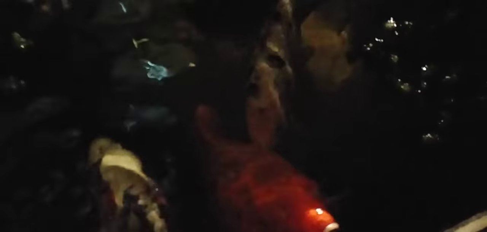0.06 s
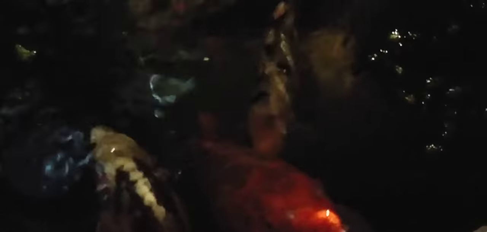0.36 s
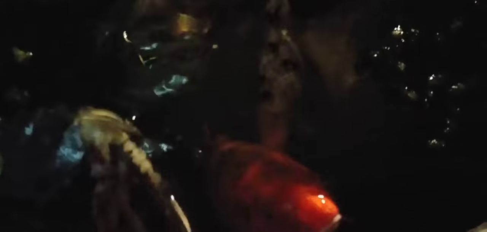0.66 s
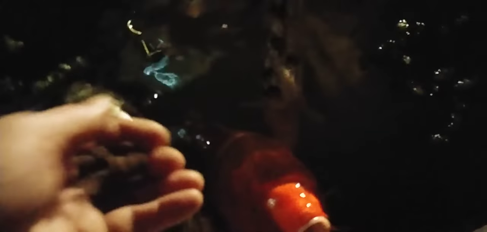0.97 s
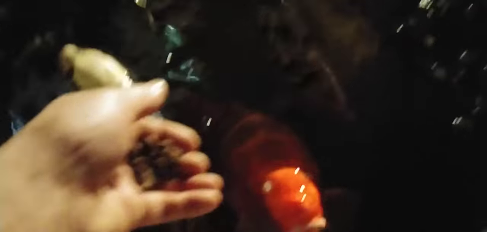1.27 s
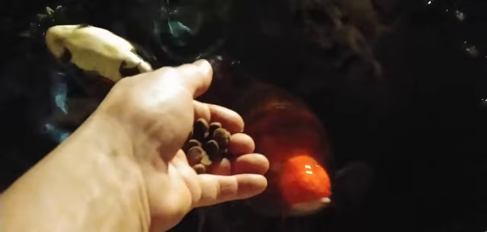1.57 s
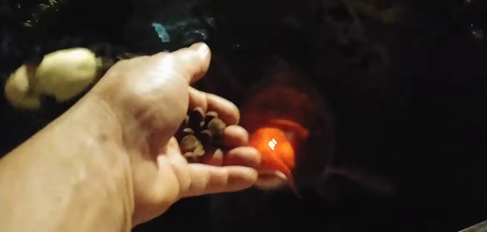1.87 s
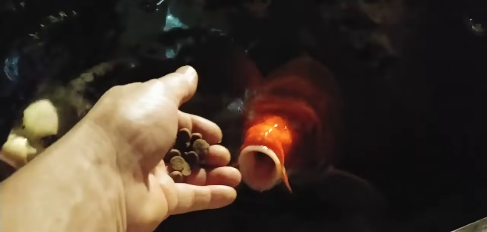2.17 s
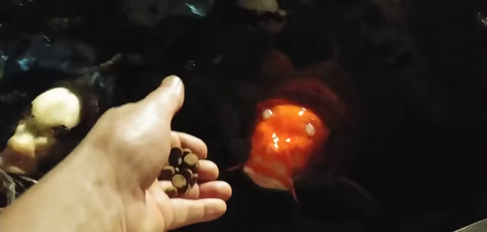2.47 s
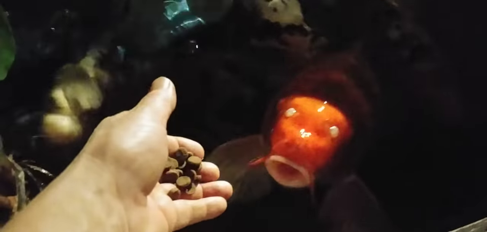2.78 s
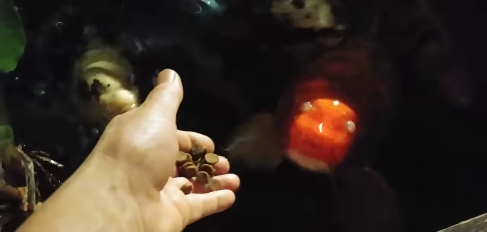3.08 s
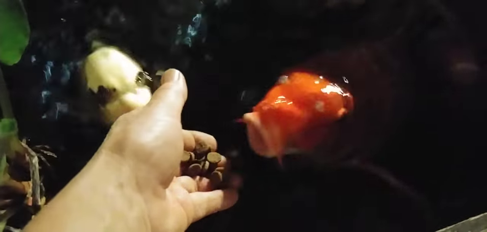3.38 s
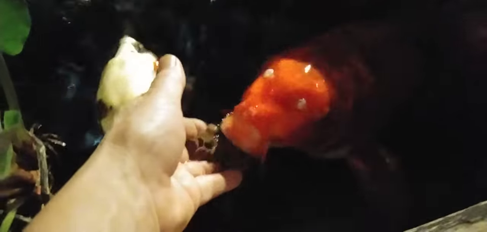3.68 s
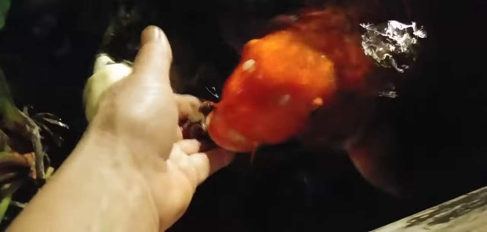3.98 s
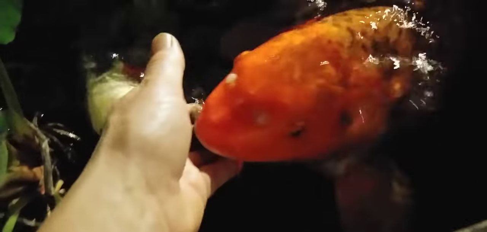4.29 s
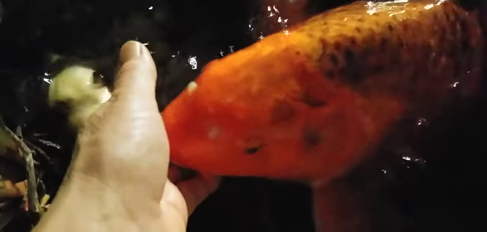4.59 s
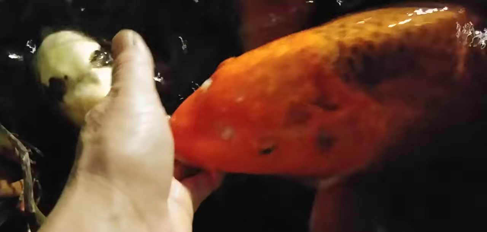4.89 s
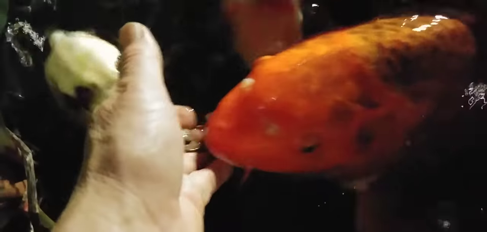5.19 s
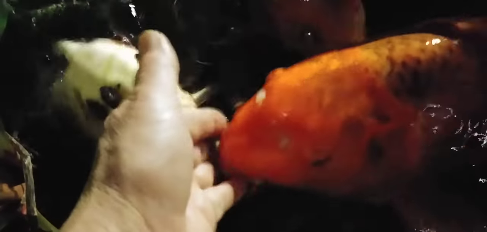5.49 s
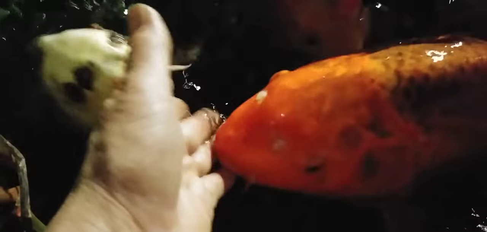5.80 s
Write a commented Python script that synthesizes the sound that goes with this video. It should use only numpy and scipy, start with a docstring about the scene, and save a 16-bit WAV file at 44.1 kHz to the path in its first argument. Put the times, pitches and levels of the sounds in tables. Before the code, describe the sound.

Fish slurp and smack at food at the surface of a pond, sloshing the water over a steady rush of inflow.

```python
"""Koi feeding at night

Koi crowd round a hand at the edge of a pond while an inflow rushes steadily behind them.
Their mouths suck air and water in wet slurps, their lips smack, and their heads push up
sloshes and gulping bubbles. A small hand-held microphone, bumped softly twice,
gives everything a nasal ring."""
import sys
import numpy as np
from scipy import signal
from scipy.fft import rfft, irfft
from scipy.io import wavfile

SR = 44100
rng = np.random.default_rng(int(sys.argv[2]) if len(sys.argv) > 2 else 0)


def to_wav(sig):
    """Store sig (one row per channel, or 1-D mono) as 16-bit WAV at the path in sys.argv[1].

    Samples outside -1..1 are clipped; the rate is SR.
    """
    pcm = np.clip(np.atleast_2d(sig), -1, 1) * 32767
    pcm = np.round(pcm).astype(np.int16)
    wavfile.write(sys.argv[1], SR, pcm.T)  # frames by channels


N = 266364
TIME = np.arange(N) / SR


def from_db(db):
    """Decibels to gain."""
    return 10 ** (np.asarray(db) / 20)


def rms_one(x):
    """Scale to unit power."""
    return x / np.sqrt(np.mean(x ** 2) + 1e-20)


def butter(x, kind, hz, order):
    """Butterworth low-pass or high-pass."""
    return signal.sosfilt(signal.butter(order, hz, kind, fs=SR, output="sos"), x)


def coloured(x, spectrum):
    """Minimum-phase EQ that follows a spectrum; rms 1."""
    hz, db = np.transpose(spectrum)
    grid = np.linspace(1, SR / 2, 2049)
    cepstrum = irfft(np.log(from_db(np.interp(np.log(grid), np.log(hz), db))))
    cepstrum[1:len(grid) - 1] *= 2
    cepstrum[len(grid):] = 0
    impulse = irfft(np.exp(rfft(cepstrum)))
    return rms_one(signal.fftconvolve(x, impulse)[:N])


def bell(x, hz, width_hz, db, block=256):
    """Bell EQ whose centre and gain may move from block to block."""
    hz, db = hz + np.zeros(N), db + np.zeros(N)
    out, state = np.zeros(N), np.zeros(2)
    for i in range(0, N, block):
        w, gain = 2 * np.pi * min(hz[i], SR / 2.2) / SR, from_db(db[i] / 2)
        damping = np.sin(w) * width_hz / (2 * hz[i])
        b = [1 + damping * gain, -2 * np.cos(w), 1 - damping * gain]
        a = [1 + damping / gain, -2 * np.cos(w), 1 - damping / gain]
        out[i:i + block], state = signal.lfilter(b, a, x[i:i + block], zi=state)
    return out


def automation(rows):
    """One control curve for each column after the time."""
    times, *columns = np.transpose(rows)
    return [np.interp(TIME, times, column) for column in columns]


def drift(per_s):
    """Random modulation that glides to a new value `per_s` times a second; rms 1."""
    knots = rng.standard_normal(8000)
    return rms_one(np.interp(TIME * per_s, np.arange(len(knots)), knots))


def swell(middle_s, length_s, squareness):
    """An envelope that rises, holds and dies away."""
    out, near = np.zeros(N), np.abs(TIME - middle_s) < .3
    distance = np.abs(2 * (TIME[near] - middle_s) / length_s)
    out[near] = 1 / np.sqrt(1 + distance ** (2 * squareness))
    return out


def clicks(per_s, spread_db):
    """Random impulses, many small and a few large."""
    sizes = from_db(spread_db * np.minimum(rng.exponential(1, N), 4.5))
    signs = rng.choice([-1, 1], N)
    return sizes * signs * (rng.random(N) < per_s / SR)


def bubbling(per_s, spread_db, cycles, low_hz, high_hz, pitches=40):
    """A cloud of bubbles, each dying by 60 dB over `cycles` cycles; even power per Hz, rms 1."""
    births, out = clicks(per_s, spread_db), np.zeros(N)
    born = np.flatnonzero(births)
    pitch_index = (rng.random(N)[born] ** .7 * pitches).astype(int)   # small bubbles outnumber large
    for k, hz in enumerate(np.geomspace(low_hz, high_hz, pitches)):
        decay = np.exp(-np.log(1000) * hz / (cycles * SR))
        w = 2 * np.pi * hz / SR
        kicks = np.zeros(N)
        kicks[::50] = 1e-15   # keeps the tails from underflowing
        starts = born[pitch_index == k]
        kicks[starts] = births[starts]
        ringing = signal.lfilter([1, 0, -1], [1, -2 * decay * np.cos(w), decay * decay], kicks)
        out += np.sqrt(hz) * rms_one(ringing)
    return rms_one(out)


def pops(rows, rise, attack_s):
    """Each pop is a damped sine whose pitch climbs by the fraction `rise` over its t60."""
    out, t = np.zeros(N), TIME[:SR // 10]
    for start_s, db, hz, t60_s in rows:
        phase = 2 * np.pi * hz * (t + rise * t * np.minimum(t / t60_s, 2) / 2)
        envelope = np.exp(-np.log(1000) * t / t60_s) * (1 - np.exp(-t / attack_s))
        pop = from_db(db) * np.sin(phase) * envelope
        at = round(start_s * SR)
        out[at:at + len(t)] += pop[:N - at]
    return out


# Tone of the falling water: frequency_hz, level_db
INFLOW_EQ = [(30, -24), (90, -16), (200, -3), (450, -7), (690, 0), (920, -5.5), (1200, -0.5), (1700, 0),
             (2550, -1.5), (2950, -5.5), (4100, -3), (4900, -6), (5900, -1.5), (7200, -13), (15500, -28)]

def inflow():
    """Falling water: a bed of bubbles and rush, louder and brighter as the microphone turns to it."""
    babble = bubbling(per_s=6500, spread_db=2.5, cycles=21, low_hz=302, high_hz=13990)
    plinks = bubbling(per_s=130, spread_db=1.0, cycles=73, low_hz=556, high_hz=4596, pitches=28)
    rush = rng.standard_normal(N) * from_db(1.96 * drift(per_s=70))
    plops = bubbling(per_s=22, spread_db=0.5, cycles=52, low_hz=600, high_hz=3400, pitches=17)
    water = babble + from_db(2.5) * rush + from_db(-7.5) * plinks + from_db(-13) * plops
    water = coloured(water, INFLOW_EQ) * from_db(0.15 * drift(per_s=22.34))   # slight surges
    treble = butter(water, "high", hz=5200, order=1)
    level_db = -33 + 0.4876 * TIME
    treble_db = -5 + 2.08 * TIME
    return from_db(level_db) * (water + treble * (from_db(treble_db) - 1))


# The arm's moving EQ on the inflow: time_s, centre_hz, band_db, shade_db
ARM_MOVES = [(0, 3700, 1, 1), (1.15, 3470, 4.5, -1), (1.45, 2680, -3.5, 0), (2.4, 2840, -3, -1),
             (3.3, 3540, -6, 0.36), (6.04, 3600, -0.5, -.5)]

def reaching_arm(stream):
    """The arm shades the inflow, and its reflection boosts or hollows one band."""
    centre_hz, band_db, shade_db = automation(ARM_MOVES)
    return bell(stream * from_db(shade_db), centre_hz, width_hz=600, db=band_db)


# Big drops that stand out of the inflow: start_s, level_db, pitch_hz
DRIP_HITS = [(.4025, -16.5, 2140), (0.648, -23, 1530), (0.754, -22, 1190), (.995, -28, 2600),
             (1.044, -21.5, 1130), (1.696, -26, 610), (1.705, -22, 4150), (1.828, -23, 640),
             (2.236, -19.5, 1430), (2.292, -24.5, 734), (2.717, -20, 4200), (3.243, -22.5, 1200)]

def drips():
    """Each large drop traps one bubble that rings briefly."""
    t60_s = 0.031
    return pops([(*drip, t60_s) for drip in DRIP_HITS], rise=.029, attack_s=0.00081)


# Dull tone of handling noise: frequency_hz, level_db
BUMP_EQ = [(30, -30), (110, -2.5), (250, -3), (450, -7.5), (900, -21), (4000, -65)]
# Two soft bumps, the second with a double touch: middle_s, length_s, level_db
BUMP_HITS = [(0.018, .024, -32), (1.336, .03, -41.5), (1.369, 0.013, -36)]

def bumps():
    """The hand holding the microphone knocks it with low thuds."""
    grip = sum(from_db(db) * swell(middle_s, length_s, squareness=1.75)
               for middle_s, length_s, db in BUMP_HITS)
    return grip * coloured(rng.standard_normal(N), BUMP_EQ)


# Tone of churned water: frequency_hz, level_db
SLOSH_EQ = [(30, -28), (90, -19), (170, -5), (330, 0), (580, 3.5), (850, -15), (1150, -7.5), (3000, -10.5),
            (9000, -34)]
# Shoves from heads and fins: middle_s, length_s, level_db, deep_mix_db
SHOVES = [(3.719, 0.027, -28.5, -4), (4.02, 0.035, -29, -8), (4.148, 0.039, -31.5, -3.5),
          (4.228, 0.038, -29, -6), (4.634, 0.046, -31.5, -16), (5.305, 0.048, -31, -20),
          (5.69, 0.061, -34, -12), (5.957, 0.037, -31.5, -12)]

def sloshes(slurp_cues):
    """Shoved water folds into large, quickly damped bubbles; a rolling body adds a deep swell."""
    churn = bubbling(per_s=2600, spread_db=3.0, cycles=11, low_hz=201.5, high_hz=6950, pitches=22)
    churn = coloured(churn + from_db(-8) * rng.standard_normal(N), SLOSH_EQ)
    deep = bubbling(per_s=500, spread_db=1.5, cycles=8.4, low_hz=169, high_hz=265, pitches=6)
    # every slurp drags water along, the more the wider the mouth gapes; columns as in SHOVES
    wakes = [(middle_s, 1.37 * length_s, -29 + 0.46 * min(body_db, 0), -19)
             for middle_s, length_s, *_, body_db in slurp_cues]
    # once the fish crowd in, the water keeps lapping between shoves
    crowd_start_s, crowd_build_s = 3.53, 0.84
    crowd = np.clip((TIME - crowd_start_s) / crowd_build_s, 0, 1)
    lapping = crowd * from_db(-43 + 4.5 * drift(per_s=16))
    churn_power, deep_power = lapping ** 2, (lapping * from_db(-12.5)) ** 2
    for middle_s, length_s, db, deep_db in [*SHOVES, *wakes]:
        shove = from_db(db) * swell(middle_s, length_s, squareness=3.4)
        churn_power += shove ** 2
        deep_power += (shove * from_db(deep_db)) ** 2
    return np.sqrt(churn_power) * churn + np.sqrt(deep_power) * deep


# Air pockets closing under water: start_s, relative_level_db, pitch_hz
GULP_HITS = [(3.713, -16, 425), (4.018, -17, 383), (4.148, -15, 630), (4.228, -7, 493), (4.494, -10, 950),
             (4.502, -9, 650), (5.113, -18.5, 327), (5.308, -16, 620), (5.326, -15.5, 387),
             (5.559, -9.5, 555), (5.665, -17.5, 400), (5.7068, -7, 1085), (5.801, -9.5, 496),
             (5.944, -11.5, 343)]

def gulps():
    """Closing air pockets plop, the larger ones for longer; the plops carry little bass."""
    ring_cycles = 10.6
    pockets = [(start_s, db, hz, ring_cycles / hz) for start_s, db, hz in GULP_HITS]
    plops = from_db(3.5) * pops(pockets, rise=0.16, attack_s=0.0013)
    return butter(plops, "high", hz=170, order=2)


# Lip smacks, and one faint high tick of food pellets in the hand:
# start_s, relative_level_db, pitch_hz, t60_s
SMACKS_AND_TICK = [(0.599, -16, 1540, 0.0029), (1.772, -28.5, 2070, 0.0064), (2.828, -26, 11400, .003),
                   (3.7263, -6.5, 3400, 0.0069), (3.7263, -10.5, 2010, 0.0058),
                   (3.7694, -10.5, 2480, 0.0041), (4.2282, -12, 2380, .0035), (4.275, -16.5, 4070, 0.013),
                   (4.4693, -15, 1900, 0.0036), (4.645, -18, 4280, .016), (4.656, -15.5, 1750, .014),
                   (4.766, -7, 4500, 0.02), (4.824, -12, 2120, 0.013), (5.0197, -7, 2380, 0.0016),
                   (5.1933, -20, 1980, 0.01), (5.2959, -3, 3300, 0.0021), (5.532, -13.5, 1940, 0.023),
                   (5.6056, -11, 3540, 0.0069), (5.708, -9.5, 2280, 0.015)]

def smacks_and_tick(spit_eq):
    """A lip film breaks with a spit and the mouth rings; the pellet tick is the same burst and ring."""
    bursts = sum(from_db(db) * swell(start_s + .001, length_s=.002, squareness=2)
                 for start_s, db, *_ in SMACKS_AND_TICK)
    spit = bursts * coloured(rng.standard_normal(N), spit_eq)
    ring = pops(SMACKS_AND_TICK, rise=0.11, attack_s=.0001)
    return from_db(5) * ring + from_db(-22.5) * spit


# Tone of the wet spray at the lips: frequency_hz, level_db
SPRAY_EQ = [(40, -16), (160, -44), (550, -3), (900, -6), (1700, -2.5), (2600, -4.5), (3400, -2), (5800, -2),
            (7200, -9.5), (10500, -10), (15500, -17.5)]
# Sucks of air: middle_s, length_s, level_db, mouth_hz, glide_octaves_per_s, squeak_mix_db, body_mix_db
SLURP_CUES = [(4.027, 0.027, -28, 2370, -3, -7, -11), (4.207, 0.019, -23, 1600, -6.5, 17.5, 26.5),
              (4.241, 0.017, -27, 5540, -7, -17, -14), (4.483, 0.032, -14, 3120, 8.5, -8.5, 4.5),
              (4.719, 0.025, -12.5, 2750, 9, -4.5, -4.5), (4.757, 0.042, -12.5, 4220, 19.5, -2, -41),
              (4.814, 0.044, -14.5, 1980, 1.5, -12, -21), (5.021, 0.013, -21.5, 2030, -1.5, -12, 1),
              (5.061, 0.052, -12.5, 3840, -2.5, -11.5, -10.5), (5.52, 0.021, -12, 2970, -5.5, -8, 0.5),
              (5.559, 0.013, -14, 3400, -6, -12, 3.5), (5.805, 0.02, -12.5, 1990, 0, -17, 4)]

def slurps():
    """Air tears through the water film at the lips in bursts and froth; the mouth cavity squeaks."""
    fizz = rms_one(clicks(per_s=2600, spread_db=4.3))
    crackle = rms_one(clicks(per_s=190, spread_db=0.3))   # larger tears in the film
    froth = bubbling(per_s=2700, spread_db=2.0, cycles=25, low_hz=1600, high_hz=13540, pitches=32)
    spray = coloured(fizz + crackle + froth + from_db(-6) * rng.standard_normal(N), SPRAY_EQ)
    thin = butter(spray, "high", hz=1600, order=6)
    body = butter(spray, "low", hz=1450, order=3)   # heard when the mouth gapes
    flutter = rms_one(from_db(1.54 * np.clip(drift(per_s=380), -2, 1)))   # the film breaks and closes
    narrow = rms_one(butter(rng.standard_normal((2, N)), "low", hz=210, order=2))
    cavity = narrow[0] + 1j * narrow[1]   # a noise band to shift up to the mouth resonance
    out = np.zeros(N)
    for middle_s, length_s, db, mouth_hz, glide, squeak_db, body_db in SLURP_CUES:
        near = np.abs(TIME - middle_s) < .12
        hz = mouth_hz * 2 ** (glide * np.clip(TIME[near] - middle_s, -length_s / 2, length_s / 2))
        squeak = np.real(cavity[near] * np.exp(2j * np.pi * np.cumsum(hz) / SR))
        suck = thin[near] + from_db(body_db) * body[near] + from_db(squeak_db) * squeak
        envelope = swell(middle_s, length_s, squareness=3.37)[near]
        out[near] += from_db(db) * envelope * rms_one(suck)
    return out * flutter


def pond_edge(x, t60_s, wet_db):
    """The decking and bank scatter back a short, faint tail."""
    t = TIME[:SR // 4]
    tail = rng.standard_normal(len(t)) * np.exp(-np.log(1000) * t / t60_s)
    return x + from_db(wet_db) * signal.fftconvolve(x, tail / np.linalg.norm(tail))[:N]


def scene():
    """The mono mix: fish up close, the inflow behind them."""
    feeding = slurps() + sloshes(SLURP_CUES) + smacks_and_tick(SPRAY_EQ) + gulps()
    feeding = pond_edge(feeding, t60_s=0.018, wet_db=-8.5)
    water = reaching_arm(inflow()) + drips()
    return (feeding + water + bumps())[None]


# The microphone's nasal ring, shifting as the hand moves: time_s, centre_hz, boost_db
NASAL_RING = [(0, 1760, 5), (1.1, 1740, 9), (1.45, 1896, 11), (2.4, 1883, 13.5), (3.5, 1792, 8),
              (6.04, 1958, 9.5)]
# Peaks and hollows of the microphone port: centre_hz, width_hz, gain_db
PORT_EQ = [(6000, 400, -1.5), (8310, 1660, -6), (9300, 1100, 2), (13660, 3700, -17.5)]

def record(dry):
    """The microphone port rings and colours the mix; peaks are rounded, rumble and top are cut."""
    ring_hz, ring_db = automation(NASAL_RING)
    sound = bell(dry[0], ring_hz, width_hz=324, db=ring_db)
    for hz, width_hz, db in PORT_EQ:
        sound = bell(sound, hz, width_hz, db)
    sound = butter(sound, "high", hz=45, order=1)
    ceiling, cutoff_hz = .95, 15750
    rounded = ceiling * sound / (ceiling ** 4 + sound ** 4) ** .25
    top_cut = signal.ellip(12, .1, 80, cutoff_hz, fs=SR, output="sos")
    return signal.sosfilt(top_cut, rounded)[None]


dry = scene()
out = record(dry)
to_wav(out)
```